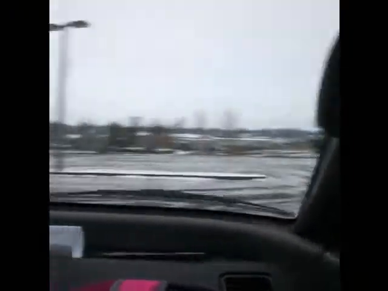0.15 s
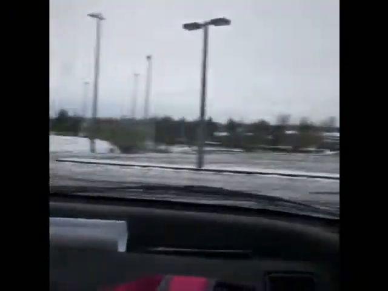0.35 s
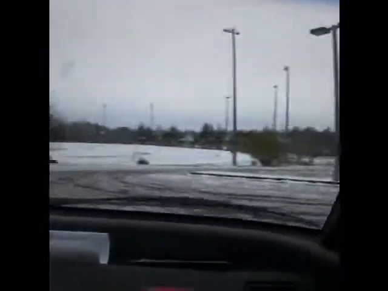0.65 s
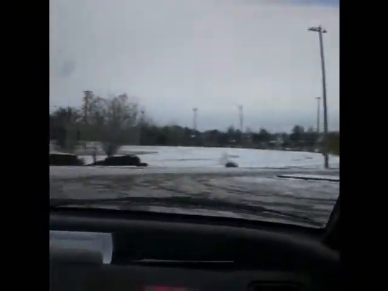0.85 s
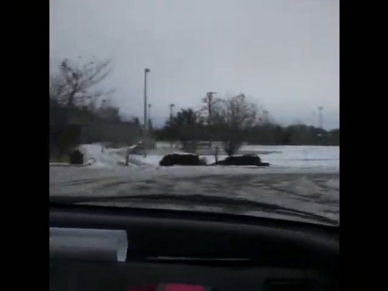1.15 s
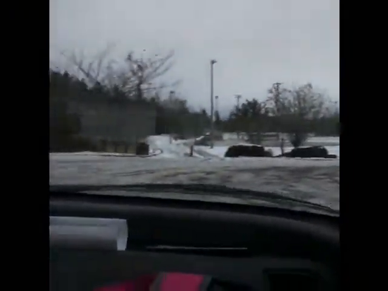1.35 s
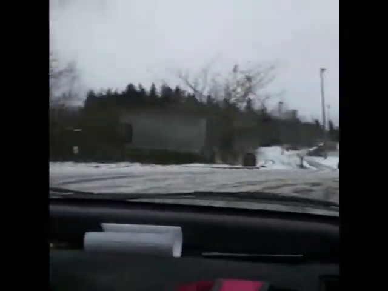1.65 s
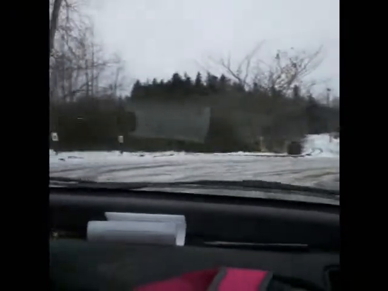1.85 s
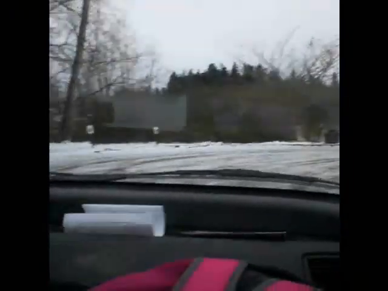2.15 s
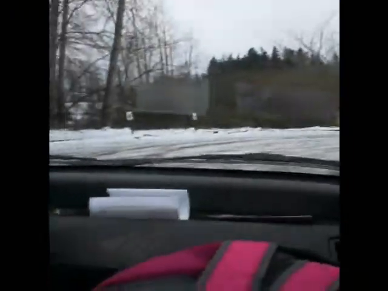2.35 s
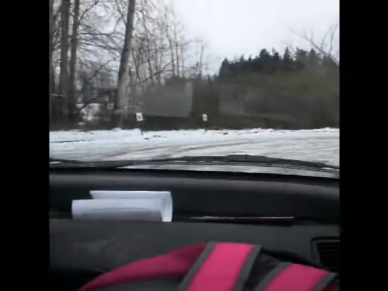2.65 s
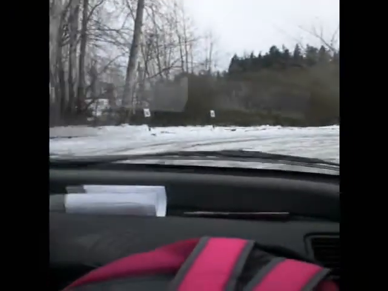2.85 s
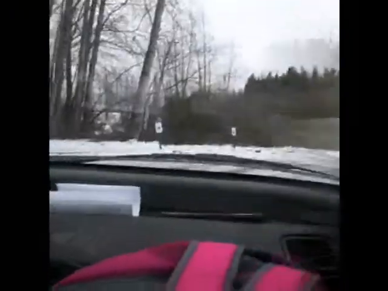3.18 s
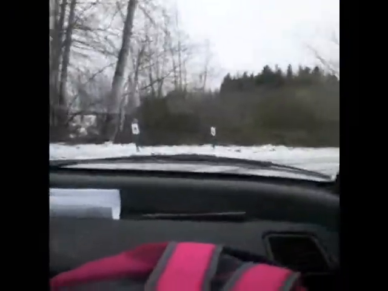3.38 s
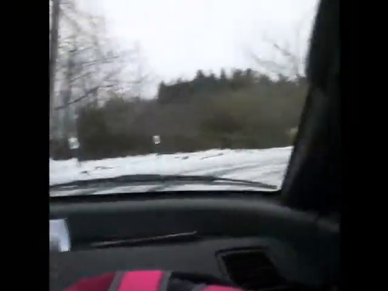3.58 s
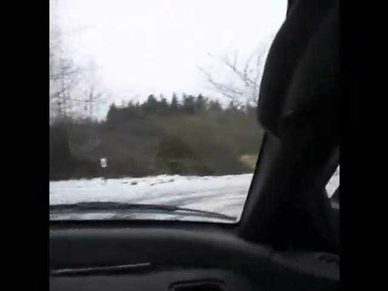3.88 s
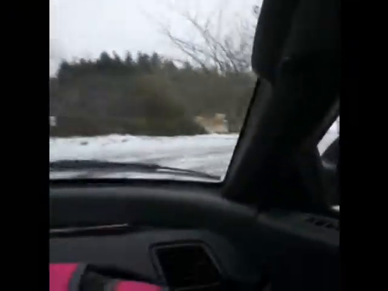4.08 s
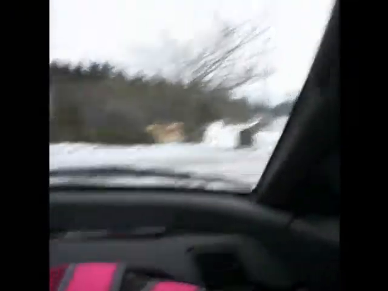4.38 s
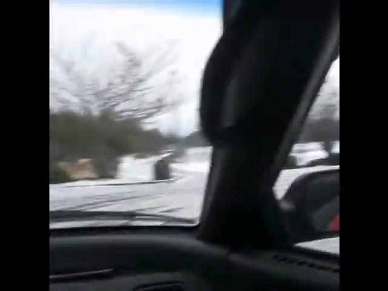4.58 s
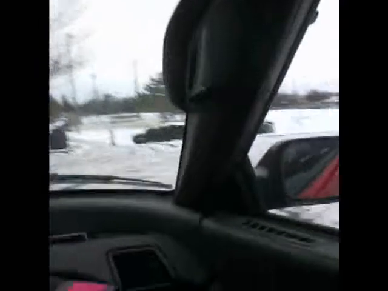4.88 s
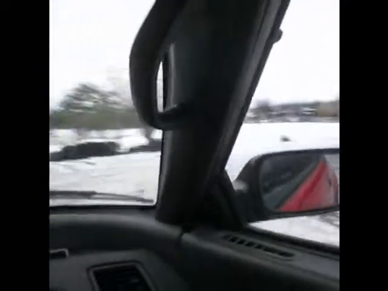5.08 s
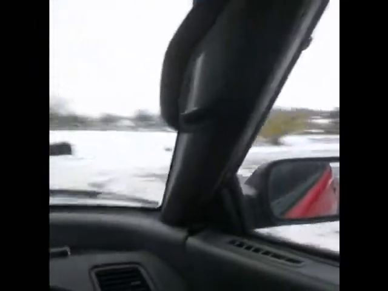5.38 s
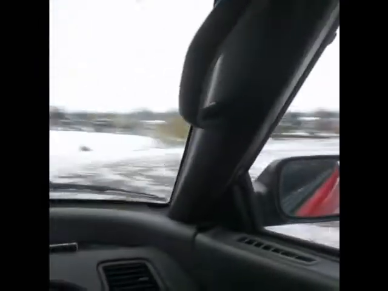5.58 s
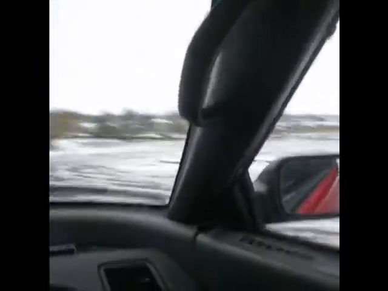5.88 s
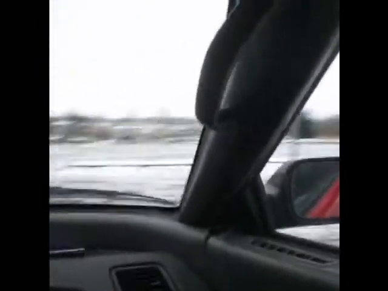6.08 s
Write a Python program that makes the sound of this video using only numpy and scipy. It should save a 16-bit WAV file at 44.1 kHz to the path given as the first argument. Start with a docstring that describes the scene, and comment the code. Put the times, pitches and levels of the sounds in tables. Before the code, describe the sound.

A hand-held microphone in a closed, boomy car picks up low engine drone and wet tyre rumble with small plasticky ticks and light scuffs. Noise sinks to near quiet around the middle, leaving hum and blower-like hiss. Then revs climb briefly, slush surges dully against the underside, and the engine winds down with an unsteady, growling tone and a handling pop.

```python
"""The engine drones inside a car that slides about on a slushy lot: its orders are sines shaped by the body.
Slush rumbles and sprays under the floor as coloured noise, while rough ground drives the cabin boom.
A blower and microphone hiss lies beneath; loose trim ticks as struck resonances; grainy noise makes scuffs
and a few smeared ticks. Ridges of slush thud as swells of dull noise, and the hand-held microphone
pops now and then."""
import sys
import numpy as np
from scipy import signal
from scipy.io import wavfile
from scipy.ndimage import uniform_filter1d

SR = 44100
rng = np.random.default_rng(int(sys.argv[2]) if len(sys.argv) > 2 else 0)


def output_pcm(signal):
    """Save a mono or channel-first signal as 16-bit PCM at the path in sys.argv[1].

    Samples are clipped to [-1, 1] before scaling.
    """
    pcm = np.clip(np.atleast_2d(signal).T, -1, 1) * 32767
    wavfile.write(sys.argv[1], SR, np.round(pcm).astype(np.int16))


N = 274736

# The ride over the lot. Each row: time in seconds, level of wet slush under the wheels in dB,
# level of body heave in dB, level of cabin boom in dB.
RIDE = [(0, -26.5, -36, -30.5), (.5, -30, -32, -29), (1.0, -32.5, -32.5, -28), (1.5, -34.5, -32.5, -29),
        (1.7, -43, -38, -39), (2.3, -42, -41, -39.5), (2.9, -47, -48, -48.5), (3.5, -43, -52, -45.5),
        (4.05, -37.5, -41, -37), (4.35, -32, -31, -34.5), (5.1, -29, -31.5, -30), (5.7, -31, -27, -30),
        (6.23, -29.5, -32, -33.5)]


def from_db(db):
    """Amplitude factor for a level in dB."""
    return 10 ** (np.asarray(db) / 20)


def rms_one(x):
    """Scale a signal to an rms of 1."""
    return x / np.sqrt(np.mean(x ** 2) + 1e-20)


def in_time(rows):
    """Draw each column after the first as a line through time."""
    seconds, *columns = np.transpose(rows)
    return [np.interp(np.arange(N) / SR, seconds, column) for column in columns]


def drift(rate_hz):
    """Slow random wandering of spread 1: coarse noise through a double one-pole low-pass."""
    step = 20   # samples between the coarse points
    settling = 4000   # coarse points dropped while the filter settles
    pole = np.exp(-2 * np.pi * rate_hz * step / SR)
    coarse = rng.standard_normal(N // step + settling + 2)
    slow = signal.lfilter([1], [1, -2 * pole, pole * pole], coarse)[settling:]
    return np.interp(np.arange(N) / step, np.arange(len(slow)), rms_one(slow))


def band(x, low_hz, high_hz):
    """Band-pass with gentle skirts."""
    sos = signal.butter(2, [low_hz, min(high_hz, .45 * SR)], "band", fs=SR, output="sos")
    return signal.sosfilt(sos, x)


def resonance(x, hz, width_hz):
    """One two-pole resonance with a peak gain near 1."""
    r = np.exp(-np.pi * width_hz / SR)
    gain = (1 - r * r) / 2
    return signal.lfilter([gain, 0, -gain], [1, -2 * r * np.cos(2 * np.pi * hz / SR), r * r], x)


def coloured(spectrum, shared_db, own_db):
    """Roughly third-octave bands of noise: all share one flicker and each adds its own; rms 1."""
    hz, level_db = np.transpose(spectrum)
    edge_count = int(3 * np.log2(hz[-1] / hz[0])) + 2
    edges = np.geomspace(hz[0], 1.2 * hz[-1], edge_count)
    white = rng.standard_normal((2, N))   # neighbouring bands take different noise
    out = 0
    for k, (low, high) in enumerate(zip(edges, edges[1:])):
        centre_db = np.interp(np.log(low * high) / 2, np.log(hz), level_db)
        flicker_db = shared_db + own_db * drift(15.0)
        out = out + from_db(centre_db + flicker_db) * band(white[k % 2], low, high)
    return rms_one(out)


def engine():
    """Crankshaft orders as sines follow the load and swell at body resonances; uneven firing makes them waver."""
    # Crankshaft speed. Each row: time in seconds, speed in turns per second.
    crank_rows = [(0, 80.5), (.35, 65), (.55, 57), (.95, 54.5), (1.35, 56.7), (1.85, 56.8), (2.75, 53.2),
                  (2.9, 53.6), (3.05, 55.3), (3.35, 62.9), (3.5, 64.1), (3.95, 65.7), (4.32, 67.4),
                  (4.65, 63.9), (4.9, 59.4), (5.35, 46), (5.9, 33.2), (6.23, 29.2)]
    # Engine load, as the level of the second order ahead of the body. Each row: time in seconds, level in dB.
    load_rows = [(0, -20.5), (.12, -27), (.33, -25.5), (.47, -29), (.58, -31.5), (1.15, -44), (1.35, -33),
                 (1.6, -33.5), (1.9, -39), (2.5, -39), (2.77, -44), (3.15, -30), (3.45, -26.5),
                 (4.03, -23.5), (4.14, -41.5), (4.33, -27.5), (5.0, -22.5), (5.25, -18), (5.38, -29.5),
                 (5.5, -13.5), (5.64, -20.5), (5.78, -16.5), (5.92, -27), (6.05, -20.5), (6.23, -28)]
    # How the body passes engine tones into the cabin. Each row: frequency in Hz, gain in dB.
    body_response = [(40, -39), (52, -28), (65, -22.5), (86, -24), (97, -2.5), (131, 2), (143, -4.5),
                     (160, -32), (190, -27), (198, -10), (228, -7), (262, -29), (325, -16), (385, -38),
                     (435, -2), (500, -24)]
    whole_orders, half_orders = (1, 2, 3, 4, 5, 6, 8), (1.5, 3.5)   # multiples of crankshaft speed
    order_fall_db = 3   # lost per order
    half_steady_db, half_db_per_slowing = -46, 1.05   # at steady speed; gain per turn/s lost each second
    first_overrun_db, overrun_slowing = 10.5, 4.6   # most gain of the first order; turns/s lost a second for it

    speed, load_db = in_time(crank_rows)[0], in_time(load_rows)[0]
    angle = 2 * np.pi * np.cumsum(speed) / SR
    slowing = np.maximum(uniform_filter1d(-np.gradient(speed) * SR, size=SR // 10), 0)
    half_db = half_steady_db + half_db_per_slowing * slowing
    first_db = first_overrun_db * np.minimum(slowing / overrun_slowing, 1)
    hz, passed_db = np.transpose(body_response)
    out = 0
    for order in whole_orders + half_orders:
        db = load_db - order_fall_db * (order - 2)
        if order in half_orders:
            db = db + half_db
        if order == 1:
            db = db + first_db
        db = db + np.interp(np.log(order * speed), np.log(hz), passed_db)
        waver_db = (.5 + .08 * slowing) * drift(9)   # stronger on the overrun
        tone = np.sin(order * angle + .06 * drift(12))
        out = out + np.sqrt(2) * from_db(db + waver_db) * tone
    return out


def road():
    """Lumps of slush make floor noise and spray swell together; rough ground also drives the cabin modes."""
    # Cabin air modes. Each row: frequency in Hz, width of each of two passes in Hz, relative level in dB.
    cabin_modes = [(107.8, 52.6, -4), (123, 38, -10.5)]
    # Colour of slush under the floor. Each row: frequency in Hz, relative level in dB per Hz.
    slush_spectrum = [(140, 2.5), (230, -2), (330, -7), (500, -13), (950, -24), (1100, -22.5),
                      (1600, -49.5)]
    # Colour of the spray. Each row: frequency in Hz, relative level in dB per Hz.
    spray_spectrum = [(530, -25), (900, -2.5), (1040, -2), (1610, -6), (3630, -12), (5060, -19),
                      (7410, -26), (11100, -28.5), (13500, -28.5), (15500, -29)]

    slush_db, heave_db, boom_db = in_time(RIDE)
    spray_db = slush_db - 17
    lumps = drift(57)
    random_walk = np.cumsum(rng.standard_normal(N))
    heave = rms_one(band(random_walk, 18, 62))
    shake = rng.standard_normal(N)
    boom = 0
    for hz, width_hz, mode_db in cabin_modes:
        once = resonance(shake, hz, width_hz)
        boom = boom + from_db(mode_db) * resonance(once, hz, width_hz)
    slush = coloured(slush_spectrum, 2.2 * lumps + 0.7 * drift(35), own_db=.6)
    spray = coloured(spray_spectrum, 0.66 * lumps + 2.2 * drift(78), own_db=1.5)
    out = from_db(heave_db) * heave + from_db(boom_db) * rms_one(boom)
    return out + from_db(slush_db) * slush + from_db(spray_db) * spray


def hiss():
    """Steady noise of blower and microphone, coloured band by band with a slight flicker."""
    # Colour of the hiss. Each row: frequency in Hz, relative level in dB per Hz.
    hiss_spectrum = [(290, -24), (500, 2), (594, 7.5), (863, 5), (1410, -4), (2570, -6.5), (7560, -19.5),
                     (15500, -23)]
    return from_db(-53) * coloured(hiss_spectrum, 0.3 * drift(60), own_db=1.5)


def trim():
    """Placed loud ticks and random faint ones, stronger on louder slush, chatter briefly and ring the trim."""
    # Loud contacts of loose trim. Each row: time in seconds, strike level in dB.
    tick_rows = [(0.0704, -35), (0.11, -40), (0.127, -33), (0.1735, -27), (0.191, -31), (0.3356, -34),
                 (0.3592, -30.5), (0.3747, -35), (0.3996, -42), (0.434, -41), (0.4788, -36), (0.4955, -35),
                 (0.543, -32), (0.6785, -42), (0.7188, -33), (0.831, -40), (0.845, -31.5), (0.861, -40),
                 (0.9058, -39), (0.934, -39), (1.0017, -50), (1.076, -43), (1.092, -36.5), (1.1708, -43),
                 (1.2596, -46), (1.3575, -40), (1.449, -33), (1.891, -38), (1.923, -35.5), (2.4914, -38),
                 (2.9053, -45), (3.7475, -45), (3.915, -47), (4.497, -43), (4.58, -35.5), (4.6284, -38),
                 (4.695, -37), (4.74, -33), (4.775, -45), (4.8303, -37), (4.978, -36), (5.272, -39),
                 (5.446, -37), (5.503, -34), (5.6875, -39), (5.85, -36), (5.904, -32), (5.962, -30.5),
                 (6.189, -40)]
    # Resonances of the trim. Each row: frequency in Hz, relative level in dB, time to fall 60 dB in seconds.
    trim_modes = [(2500, -14, .006), (3400, -11, .007), (4680, -3, .007), (5900, -9, .005),
                  (8600, -13, .004), (13600, -15, .003)]
    faint_per_second, chatter_seconds = 110, .0032

    seconds, strike_db = np.transpose(tick_rows)
    at = np.round(seconds * SR).astype(int)
    happens = rng.random(N) < faint_per_second / SR
    extra_db = 8.9 * np.minimum(rng.exponential(1, N), 3)
    faint = happens * from_db(in_time(RIDE)[0] - 39.5 + extra_db)
    spread_db = rng.normal(0, 1.2, (len(at), len(trim_modes)))   # each tick excites the modes differently
    dying = np.exp(-1 / (chatter_seconds * SR))
    out = np.zeros(N)
    for (hz, level_db, t60), own_db in zip(trim_modes, spread_db.T):
        touches = faint * from_db(level_db + 1.6 * rng.standard_normal(N))
        touches[at] = from_db(strike_db + level_db + own_db)
        tail = signal.lfilter([.06], [1, -dying], touches + 1e-18)
        chatter = touches + tail * rng.standard_normal(N)
        r, w = from_db(-60 / (t60 * SR)), 2 * np.pi * hz / SR
        out += signal.lfilter([0, np.sin(w)], [1, -2 * r * np.cos(w), r * r], chatter)
    return out


def stroke(length):
    """A swell over a length in seconds that rises faster than it falls."""
    return np.sin(np.pi * np.sqrt(np.linspace(0, 1, round(length * SR))))


def scuffs():
    """Short grainy bursts: a broad resonance, a narrow one below it and a thin wide wash around them."""
    # Scuffs and a few smeared ticks. Each row: start in seconds, length in seconds, centre in Hz,
    # level in dB ahead of wash and swell.
    scuff_rows = [(0.44, 0.21, 2490, -47), (0.493, 0.1, 4570, -58), (0.631, 0.011, 3500, -42),
                  (0.966, 0.0092, 6570, -47.5), (0.674, 0.044, 2720, -49.5), (0.758, 0.017, 3020, -45.5),
                  (0.81, 0.018, 1710, -40), (1.103, 0.037, 1290, -41), (1.827, 0.024, 1100, -50),
                  (1.318, 0.022, 2170, -46), (1.452, 0.046, 2480, -49), (1.881, 0.026, 3540, -56.5),
                  (1.986, 0.041, 2400, -51), (2.195, 0.026, 2490, -50.5), (2.24, 0.073, 2480, -52),
                  (2.43, 0.0069, 5070, -48), (2.459, 0.02, 5000, -48), (4.819, 0.088, 2760, -48),
                  (5.263, 0.026, 2880, -47), (5.402, 0.013, 3570, -47), (5.452, 0.013, 3030, -44.5),
                  (5.713, 0.031, 2470, -42), (5.951, 0.091, 2660, -48), (6.146, 0.023, 4770, -48.5)]
    out = np.zeros(N)
    grain = rng.standard_normal(N) * from_db(3.0 * drift(150))
    for seconds, length, hz, level_db in scuff_rows:
        start, swell = round(seconds * SR), stroke(length)
        part = slice(start, start + len(swell))
        noise = grain[part]
        broad = band(noise, hz / 1.28, hz * 1.24)
        narrow = 3 * resonance(noise, 0.767 * hz, 0.054 * hz)
        core = rms_one(broad + narrow)
        wash = from_db(-7.5) * band(noise, hz / 4, hz * 2.7)
        out[part] += from_db(level_db) * (core + wash) * np.sqrt(np.abs(swell))
    return out


def surges():
    """Ridges of slush thrown up under the floor: each is a short swell of dull, flickering noise."""
    # Ridges. Each row: start in seconds, length in seconds, level in dB at the top of the swell.
    surge_rows = [(3.35, 0.15, -41), (4.291, 0.048, -28.5), (4.341, 0.034, -28), (4.442, 0.019, -27),
                  (4.599, 0.13, -26.5), (4.732, 0.016, -30), (4.907, 0.11, -33), (4.988, 0.078, -24.5),
                  (5.058, 0.12, -27.5), (5.181, 0.1, -28), (5.385, 0.25, -30.5), (5.585, 0.035, -29.5),
                  (5.68, 0.11, -28.5), (5.809, 0.08, -25), (5.947, 0.12, -31)]
    # Colour of the thuds. Each row: frequency in Hz, relative level in dB per Hz.
    thud_spectrum = [(150, -10), (230, 2), (420, -14.5), (1100, -19), (1500, -34)]
    envelope = np.zeros(N)
    for seconds, length, level_db in surge_rows:
        swell = stroke(length)
        start = round(seconds * SR)
        envelope[start:][:len(swell)] += from_db(level_db) * swell
    return envelope * coloured(thud_spectrum, 1.6 * drift(40), own_db=1.5)


def pops():
    """The microphone membrane is pushed at once, creeps back to its rest or past it and snaps home."""
    # Pops. Each row: start in seconds, push level in dB ahead of smoothing, direction of the push,
    # length in seconds, overshoot past rest as a share of the push.
    pop_rows = [(3.373, -27, 1, .0022, .9), (3.3852, -28, -1, .0022, 1.3), (3.405, -27, 1, .0022, 1.1),
                (3.4438, -29, 1, .0022, 1.3), (3.4635, -27, -1, .002, 1.2), (3.8378, -20, 1, .0031, .7),
                (6.097, -12, 1, .0045, .0), (6.1057, -14, 1, .003, .0), (6.1205, -16, -1, .003, .0)]
    out = np.zeros(N)
    for seconds, push_db, direction, length, overshoot in pop_rows:
        start, t = round(seconds * SR), np.linspace(0, np.pi, round(length * SR))
        creep = (1 - overshoot) / 2 + (1 + overshoot) / 2 * np.cos(t)
        out[start:start + len(t)] += np.sign(direction) * from_db(push_db) * creep
    return signal.lfilter([.33], [1, -.67], out)   # rounds the edges


def scene():
    """All layers added into one channel."""
    mix = engine() + road() + hiss() + trim() + scuffs() + surges() + pops()
    return mix[None]


def record(dry):
    """A steep low-pass cuts the top above 15650 Hz."""
    return signal.sosfilt(signal.ellip(10, .5, 70, 15650, fs=SR, output="sos"), dry)


dry = scene()
out = record(dry)
output_pcm(out)
```